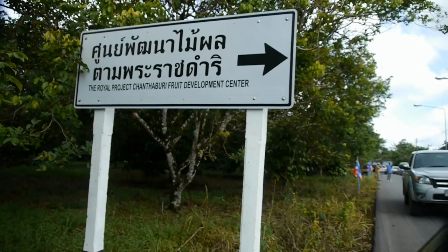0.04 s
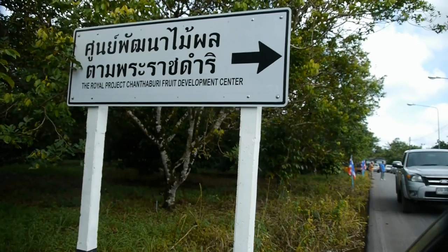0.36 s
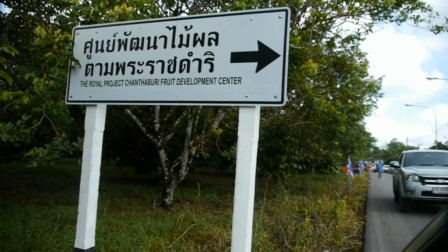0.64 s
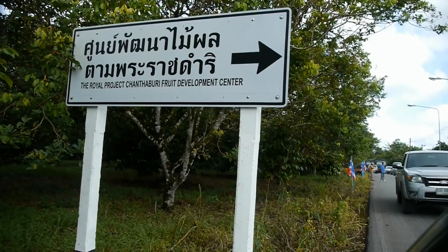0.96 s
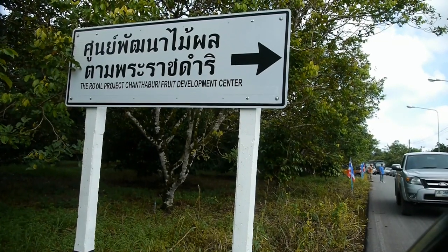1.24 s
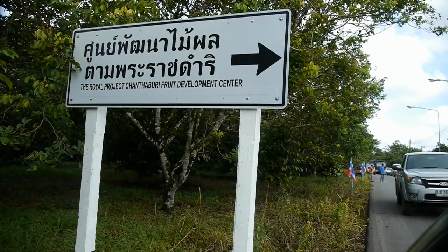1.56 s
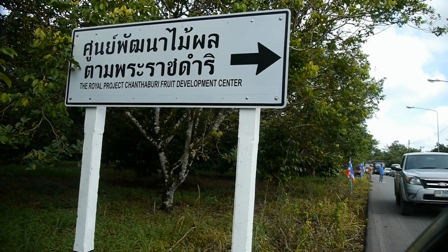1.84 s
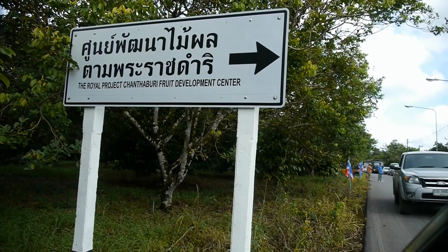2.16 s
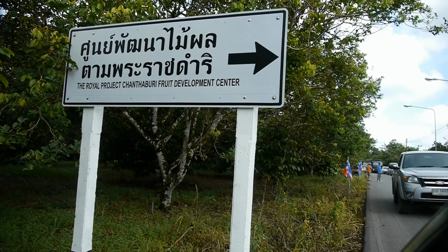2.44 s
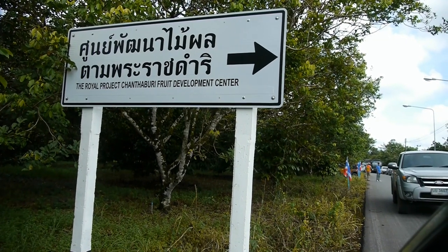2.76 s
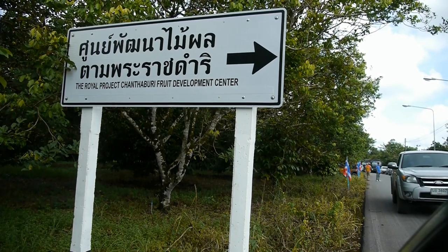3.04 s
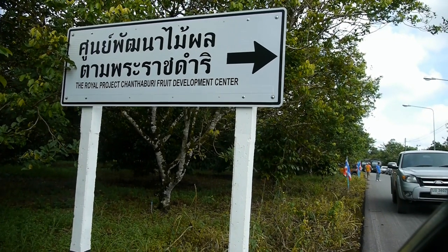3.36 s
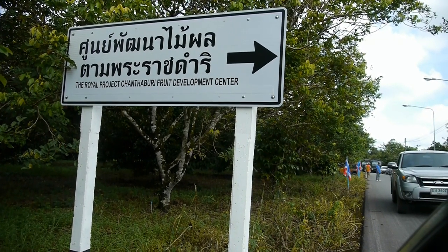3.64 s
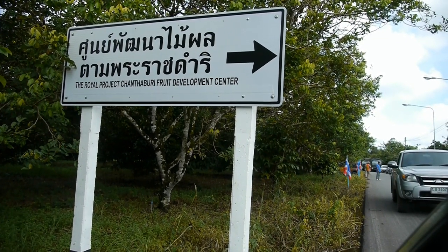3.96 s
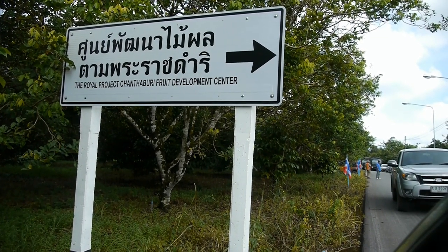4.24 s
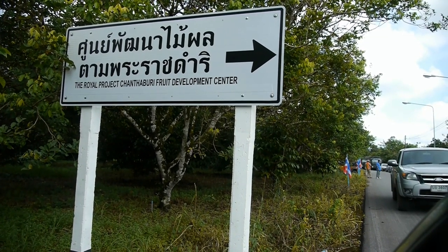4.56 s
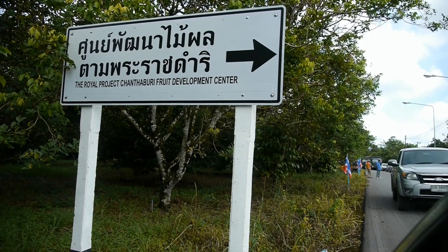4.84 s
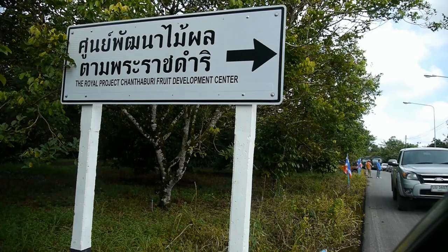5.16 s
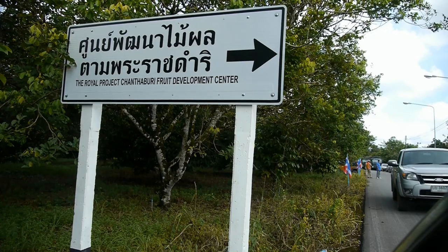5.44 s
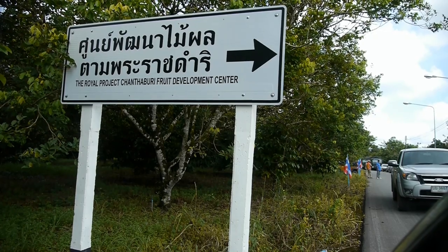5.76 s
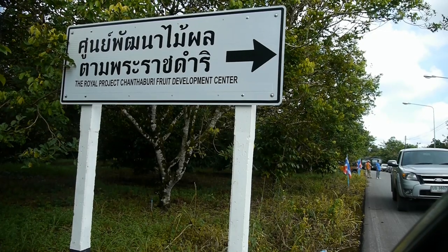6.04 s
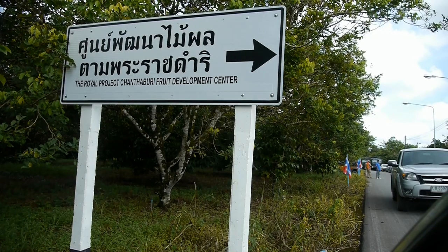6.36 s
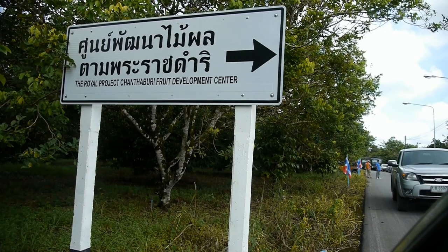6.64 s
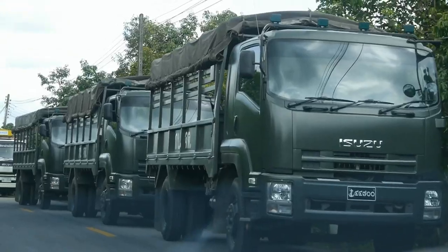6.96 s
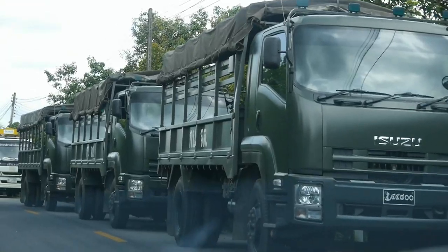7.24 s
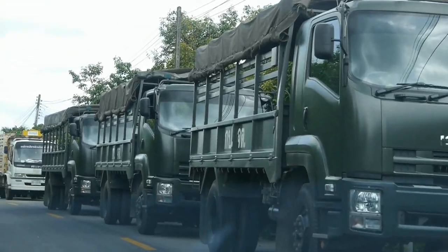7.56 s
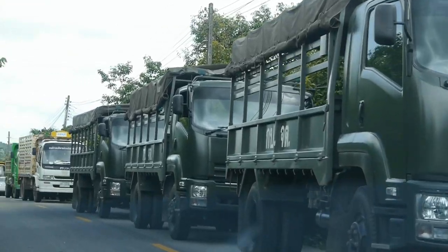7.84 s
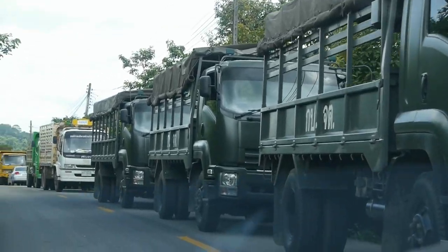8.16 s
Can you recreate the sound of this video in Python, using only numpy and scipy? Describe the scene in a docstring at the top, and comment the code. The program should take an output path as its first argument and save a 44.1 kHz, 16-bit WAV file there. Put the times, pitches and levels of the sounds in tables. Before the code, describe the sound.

Inside a car, a fan rushes over a humming engine while air brakes puff; after a short gap the fan returns louder and hollower.

```python
"""Inside a car at the roadside, two scenes. From 0.3 s the engine hums, one overtone booming, under
the air-conditioning blower: turbulent air from the right, coloured by ducts and cabin. Four puffs of
compressed air, probably truck brakes, hiss and ring their metal valve housing, the hardest at 4.1 s;
trim knocks faintly. Silence from 6.1 s. At 6.8 s the second scene opens with a soft low knock:
the engine runs slightly faster, the blower is louder, central and hollower."""
import sys
import numpy as np
from scipy.fft import rfft, irfft, next_fast_len
from scipy.io import wavfile
from scipy.ndimage import map_coordinates

SR = 44100
rng = np.random.default_rng(int(sys.argv[2]) if len(sys.argv) > 2 else 0)


def wav_out(sig):
    """Save sig, one row per channel (or a flat mono array), as 16-bit PCM at SR to the path in sys.argv[1]."""
    wavfile.write(sys.argv[1], SR, np.round(np.clip(np.atleast_2d(sig).T, -1, 1) * 32767).astype(np.int16))


N = 361619
TIME_S = np.arange(N) / SR
FFT_SIZE = next_fast_len(N + 8192)
FREQ_HZ = np.fft.rfftfreq(FFT_SIZE, 1 / SR)

# scenes: start_s, end_s
SCENE_SPANS = [(.2555, 6.0945), (6.7952, 8.3)]
# engine firing rate: scene_1_hz, scene_2_hz
FIRING_HZ = (50.3, 51.17)
# overtones of the firing rate: order, scene_1_db, scene_2_db
OVERTONES = [(2, -62.5, -54.5), (3, -59, -47), (4, -65, -48.5), (5, -60.5, -50.5), (6, -50.5, -46.5),
             (7, -40, -48), (9, -54.5, -49), (12, -46.5, -43.5)]
# dips of the booming overtone: centre_s, length_s, depth_db
BOOM_DIPS = [(.26, .24, 8), (1.07, 0.24, 12), (1.53, 0.64, 11)]
# trim knocks: start_s, level_db, centre_hz, width_octaves, t60_s
KNOCKS = [(1.063, -32.5, 2100, .6, .075), (4.175, -24.5, 500, .35, .1), (6.812, -40, 60, .7, .11)]
# blower air spectrum, scenes 1 and 2: freq_hz, relative_db
AIR_1 = [(15, -93), (25, -58), (70, -34.5), (91, -33.5), (119, -19.5), (140, -21.5), (268, -10.5),
         (351, -5), (380, -6), (512, -4.5), (618, -5.5), (809, -7.5), (1030, -11.5), (4800, -24.5),
         (15700, -43)]
AIR_2 = [(15, -74), (25, -41), (70, -34), (86, -26), (144, -17.5), (333, -6.5), (540, 0), (809, -5.5),
         (1210, -15), (1310, -22.5), (1460, -15), (2720, -19.5), (4300, -21.5), (6810, -25.5),
         (15700, -39.5)]
# duct and cabin resonances: centre_hz, width_hz, gain_db
DUCT_1 = [(78, 28, -1), (115, 26, -1), (140, 10, 2.5), (325, 91, 0.5), (489, 96, -6.5), (604, 230, 2),
          (823, 140, -3), (1026, 32, 4), (1580, 220, 1.5), (2100, 500, -1.5), (3230, 570, 1),
          (4900, 600, 2)]
DUCT_2 = [(380, 28, -1.5), (465, 49, 3), (535, 120, 1.5), (798, 68, -5), (1227, 116, 7), (1380, 120, 4.5),
          (1498, 50, 7), (1640, 70, 3), (2280, 110, -0.5), (2770, 150, -5), (3270, 140, 2.5),
          (4580, 610, 2.5), (6900, 770, 2)]
# left-right likeness of the air: freq_hz, coherence
COHERENCE_1 = [(250, 0.99), (750, 1), (1400, 0.84), (2300, .48), (3200, 0.68), (5000, 0.11), (11000, .28)]
COHERENCE_2 = [(400, 0.99), (900, 0.94), (1500, 0.73), (2200, 0.43), (6500, 0.29), (9500, 0.046)]
# balance of the air: freq_hz, left_minus_right_db
BALANCE_1 = [(60, 2.5), (120, 2), (240, -1), (480, -1), (950, -3.5), (1890, -8), (3770, -7.0), (7520, -2.5),
             (15000, -0.5)]
BALANCE_2 = [(60, 0.0), (240, 0.1), (950, 0.5), (3770, 0.5), (15000, 1.0)]
# left-right phase of the air: freq_hz, left_lead_rad
LEAD_1 = [(100, 0.052), (350, 0.051), (600, 0.69), (1000, 0.69), (1700, 0.56), (2400, 1.6), (4000, 1.3),
          (7000, 2.4)]
LEAD_2 = [(350, .02), (600, 0.065), (1300, .05), (2400, 1.4), (4400, .2)]
# valve housing modes: pitch_hz, soft_puff_relative_db, hard_puff_relative_db
HOUSING_MODES = [(3176, -10, -17), (3476, -7, -9), (4393, -11, -9), (4510, -13, -10), (4845, -18, -2),
                 (5222, 1.5, -10), (5540, -18, 0), (5750, -12, -11), (5864, -9, -2), (6510, -8, -6),
                 (6610, -28, -5), (7130, -18, -10), (7467, -14, -24), (7793, -16, -8), (7940, -8, -11),
                 (8750, -11, -19), (9065, -21, -10), (9335, -11, -15), (10680, -30, -17), (11038, -11, -7),
                 (11222, -11, -23), (11594, -26, -15), (12064, -19, -20), (13860, -17, -28)]
# spectra of the escaping jet and its low gust: freq_hz, relative_db
JET_SPECTRUM = [(1500, -30), (3200, -6.5), (5500, -0.5), (9000, -6.5), (12000, -9.5), (15500, -24)]
GUST_SPECTRUM = [(110, -35), (180, 0.5), (550, 2), (1500, -5), (3000, -4), (6000, -42.5)]
# brake puffs: start_s, gain_db, rise_s, hold_s, t60_s, low_cut_hz, ring_db, tilt_db_per_octave, is_hard
PUFFS = [(0.368, -37.5, .01, .005, .22, 6000, -18, 4, 0), (1.592, -27.4, .016, .031, .39, 3300, -1, 4.6, 0),
         (4.106, -20.3, .013, .022, .42, 3200, -1.5, -.3, 1),
         (4.77, -36, 0.011, .012, 0.28, 7440, -11, -2.5, 0)]


def amp(db):
    """Decibels to gain."""
    return 10 ** (np.asarray(db) / 20)


def curve(points):
    """(freq_hz, value) points joined on a log axis."""
    hz, values = np.transpose(points)
    return np.interp(np.log(FREQ_HZ + 1), np.log(hz + 1), values)


def wobble(knots_per_s):
    """Smooth random curve."""
    return map_coordinates(rng.standard_normal(int(N * knots_per_s / SR) + 4), [TIME_S * knots_per_s])


def white_spectra():
    """Spectra of two independent white noises."""
    return rfft(rng.standard_normal((2, FFT_SIZE)))


def noise(colour):
    """Two independent noises of one colour, rms 1."""
    pair = irfft(white_spectra() * colour, FFT_SIZE)[:, :N]
    return pair / np.sqrt(np.mean(pair ** 2) + 1e-20)


def envelope(start_s, rise_s, hold_s, t60_s):
    """Linear rise, hold, exponential decay."""
    age_s = TIME_S - start_s
    return np.clip(age_s / rise_s, 0, 1) * amp(-60 * np.maximum(age_s - rise_s - hold_s, 0) / t60_s)


def cabin_boom_db(waver_db=1, fade_db_per_s=0.3):
    """Gain of the overtone booming in the cabin: wavers, dips, slowly fades."""
    dip_db = sum(depth_db * np.cos(np.pi * np.clip((TIME_S - centre_s) / length_s, -.5, .5)) ** 2
                 for centre_s, length_s, depth_db in BOOM_DIPS)
    return waver_db * wobble(9) - dip_db - fade_db_per_s * TIME_S


def engine(firing_hz, overtones, drift, waver_db):
    """Overtones of a slightly hunting firing rate, each wavering by waver_db."""
    phase = 2 * np.pi * np.cumsum(firing_hz * (1 + drift * wobble(4))) / SR
    hum = np.zeros(N)
    for order, level_db in overtones:
        peak = np.sqrt(2) * amp(level_db + waver_db * wobble(7.7))
        hum += peak * np.sin(order * phase + rng.uniform(0, 2 * np.pi))
    return hum


def trim_knocks():
    """Damped trim: brief noise bands, no ring."""
    out = np.zeros(N)
    for start_s, level_db, centre_hz, width_octaves, t60_s in KNOCKS:
        band = np.exp(-.5 * (np.log2((FREQ_HZ + 1) / centre_hz) / width_octaves) ** 2)
        out += amp(level_db) * envelope(start_s, .0034, .0015, t60_s) * noise(band)[0]
    return out


def blower(air, duct, coherence, balance, lead, flutter_db):
    """Turbulent air coloured by ducts and cabin, partly coherent between left and right."""
    duct_db = sum(db / (1 + (2 * (FREQ_HZ - hz) / width_hz) ** 4) for hz, width_hz, db in duct)
    colour = amp(curve(air) + duct_db)
    likeness = np.clip(curve(coherence), 0, 1)
    pan = amp(curve(balance) / 2)
    lead_rad = curve(lead)
    common, separate = white_spectra()
    left = common * pan
    right = (likeness * np.exp(-1j * lead_rad) * common + np.sqrt(1 - likeness ** 2) * separate) / pan
    sum_gain = np.sqrt(pan ** 2 + pan ** -2 + 2 * likeness * np.cos(lead_rad))
    pair = irfft(np.array([left, right]) * colour / sum_gain, FFT_SIZE)[:, :N]
    return pair / np.std(pair.mean(axis=0)) * amp(flutter_db * wobble(8.1))


def opening_gain(hz, low_cut_hz):
    """A small opening passes only treble."""
    return 1 / np.sqrt(1 + (low_cut_hz / (hz + 1)) ** 20)


def housing_ring(start_s, mode_hz, gains, width_hz=14, spread_rad=0.7, damping_db_per_s_per_hz=.004):
    """Air-driven metal modes: phases wander and differ by side; high modes die sooner."""
    age_s = np.arange(SR * 3 // 4) / SR
    count = len(mode_hz)
    wander = np.cumsum(rng.standard_normal((count, len(age_s))), axis=1)
    wander *= np.sqrt(2 * np.pi * width_hz / SR)
    offset = 2 * np.pi * rng.random((count, 1)) + spread_rad * rng.standard_normal((2, count, 1))
    damping = amp(-damping_db_per_s_per_hz * (mode_hz[:, None] - mode_hz.min()) * age_s)
    modes = np.sqrt(2) * damping * np.sin(2 * np.pi * mode_hz[:, None] * age_s + wander + offset)
    ring = gains @ modes / np.linalg.norm(gains)
    return np.pad(ring, ((0, 0), (round(start_s * SR), N)))[:, :N]


def air_brakes(jet_db=-6, gust_db=-13, ring_delay_s=.004, pan_left_db=1):
    """The valve opens, hisses, rings its housing and dies away as the pressure drops."""
    out = np.zeros((2, N))
    mode_hz, soft_db, hard_db = np.transpose(HOUSING_MODES)
    for start_s, gain_db, rise_s, hold_s, t60_s, low_cut_hz, ring_db, tilt_db_per_oct, is_hard in PUFFS:
        colour = amp(curve(JET_SPECTRUM) + tilt_db_per_oct * np.log2(FREQ_HZ + 1))
        jet = noise(colour * opening_gain(FREQ_HZ, low_cut_hz))
        jet *= envelope(start_s, rise_s, hold_s, t60_s)
        mode_gains = amp(hard_db if is_hard else soft_db) * opening_gain(mode_hz, low_cut_hz)
        ring = housing_ring(start_s, mode_hz, mode_gains)
        ring *= envelope(start_s + ring_delay_s, rise_s, hold_s, t60_s)
        out += amp(gain_db) * (amp(jet_db) * jet + amp(ring_db) * ring)
        if is_hard:
            gust = noise(amp(curve(GUST_SPECTRUM)))[0]
            out += amp(gain_db + gust_db) * gust * envelope(start_s, rise_s=.08, hold_s=.019, t60_s=.51)
    return out * amp([[pan_left_db], [-pan_left_db]])


def first_scene(boom_order=7):
    """Air from a vent on the right, booming hum, brake puffs."""
    air = amp(-33) * blower(AIR_1, DUCT_1, COHERENCE_1, BALANCE_1, LEAD_1, flutter_db=0.27)
    boom_db = cabin_boom_db()
    overtones = [(order, db + boom_db * (order == boom_order)) for order, db, _ in OVERTONES]
    return air + engine(FIRING_HZ[0], overtones, drift=0.00304, waver_db=0.4) + air_brakes()


def second_scene(fade_in_s=.024):
    """Air roaring in the cabin's middle resonance, slightly faster engine."""
    air = amp(-25.5) * blower(AIR_2, DUCT_2, COHERENCE_2, BALANCE_2, LEAD_2, flutter_db=0.95)
    overtones = [(order, db) for order, _, db in OVERTONES]
    hum = engine(FIRING_HZ[1], overtones, drift=0.00184, waver_db=0)
    fade_in_db = np.interp(TIME_S - SCENE_SPANS[1][0], [0, fade_in_s], [-6, 0])
    return amp(fade_in_db) * (air + hum)


def scene(edge_s=.001):
    """Both scenes gated to their spans, plus knocks."""
    gates = [np.clip(np.minimum(TIME_S - start_s, end_s - TIME_S) / edge_s, 0, 1)
             for start_s, end_s in SCENE_SPANS]
    return first_scene() * gates[0] + second_scene() * gates[1] + trim_knocks()


def record(dry, cutoff_hz=15800, edge_hz=100):
    """Steep low-pass."""
    passband = np.clip((cutoff_hz - FREQ_HZ) / edge_hz + .5, 0, 1)
    return irfft(rfft(dry, FFT_SIZE) * passband, FFT_SIZE)[:, :N]


dry = scene()
out = record(dry)
wav_out(out)
```